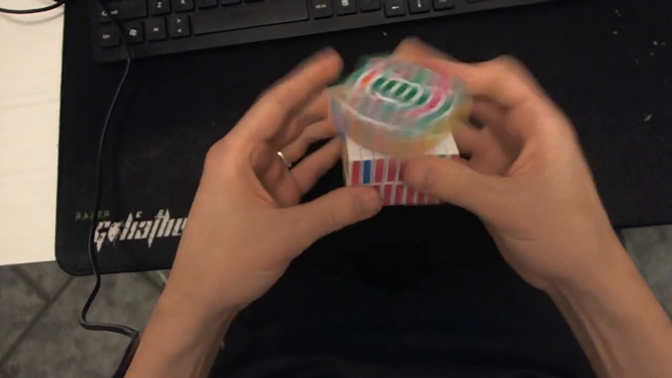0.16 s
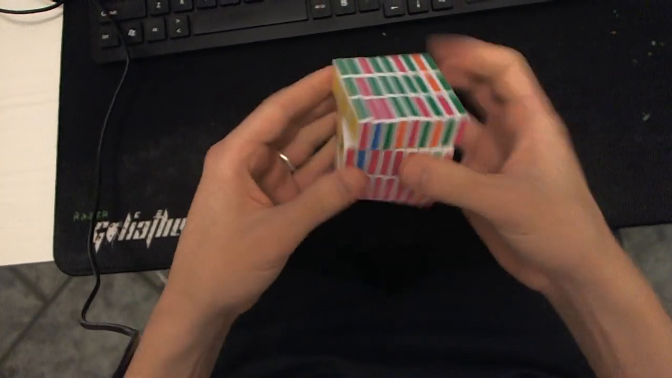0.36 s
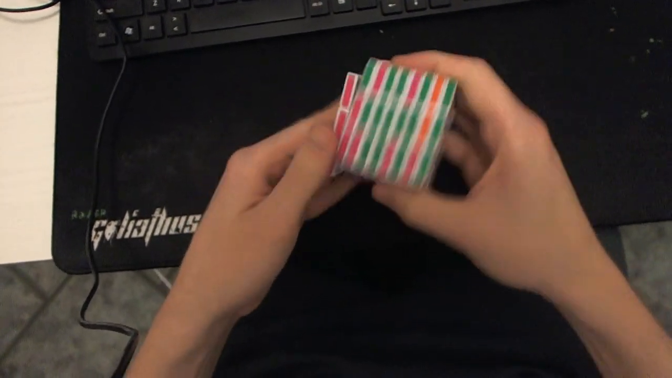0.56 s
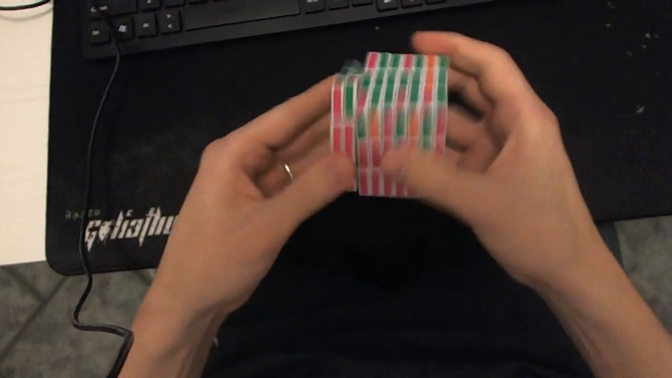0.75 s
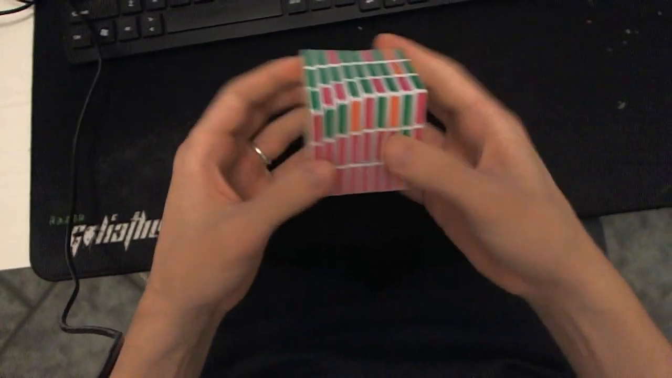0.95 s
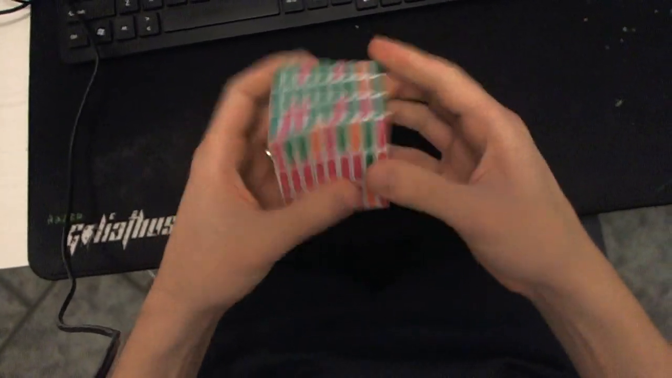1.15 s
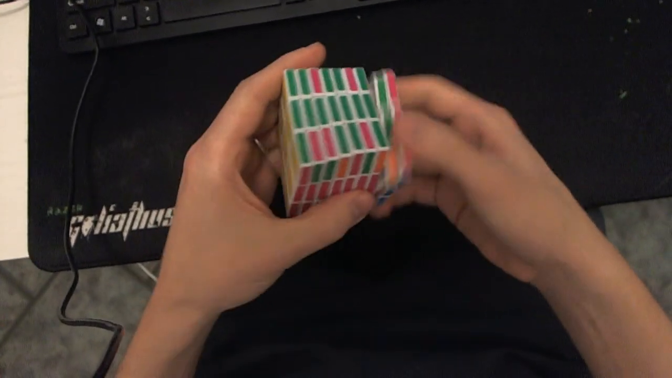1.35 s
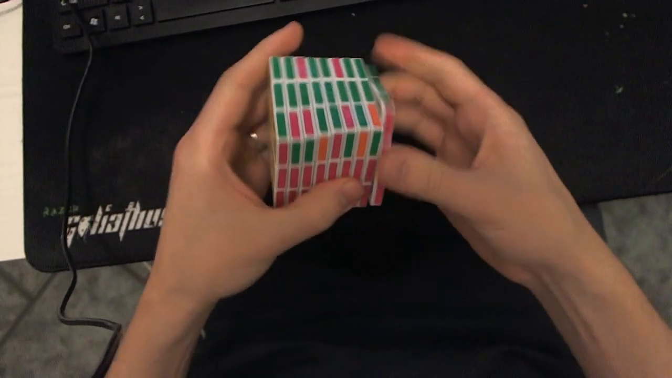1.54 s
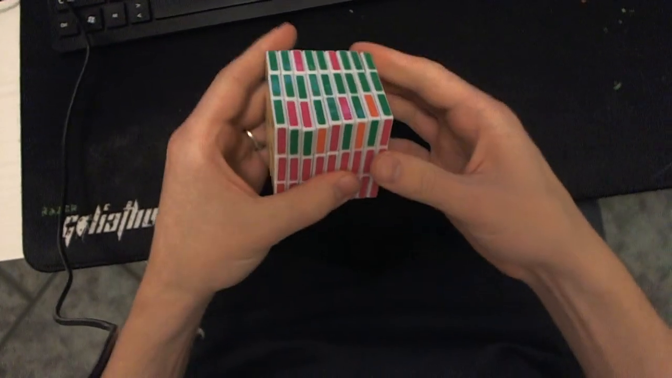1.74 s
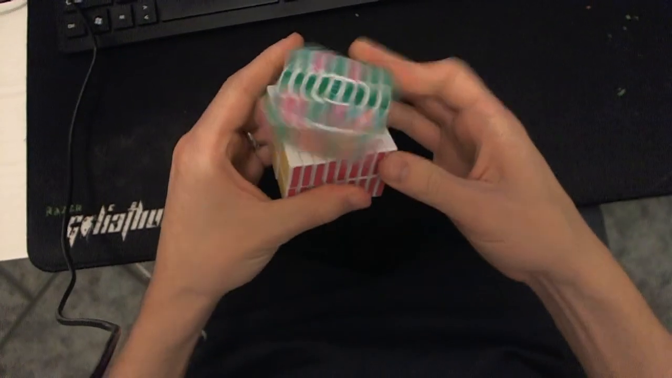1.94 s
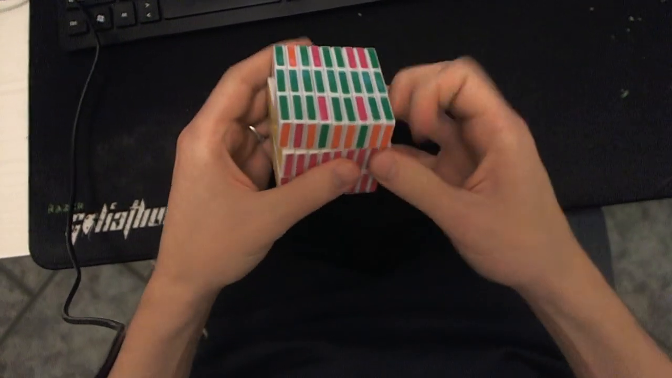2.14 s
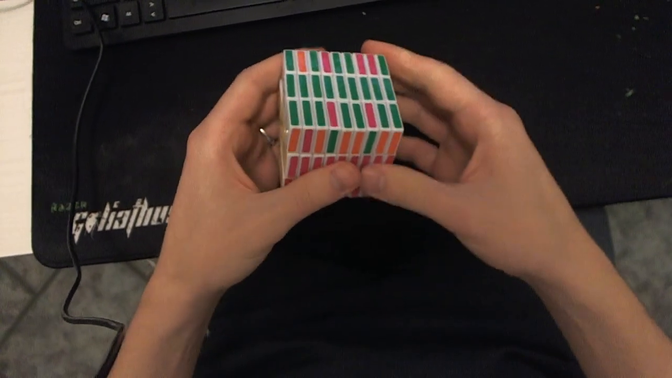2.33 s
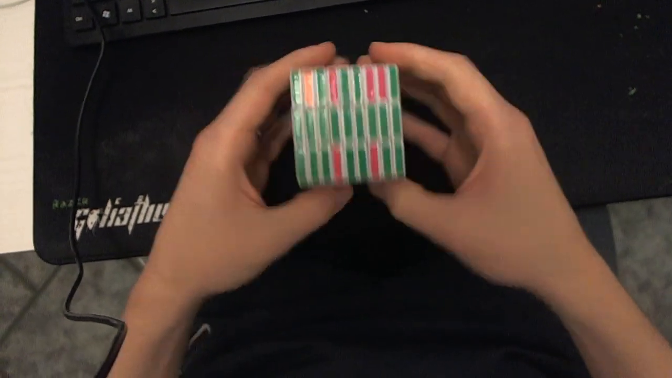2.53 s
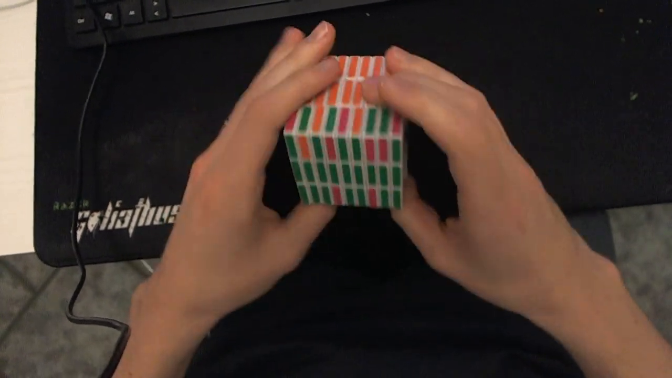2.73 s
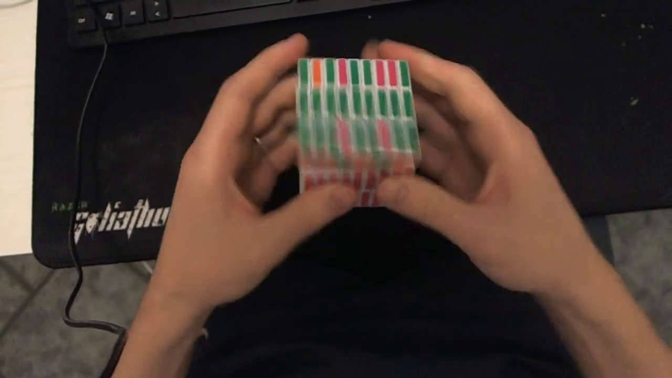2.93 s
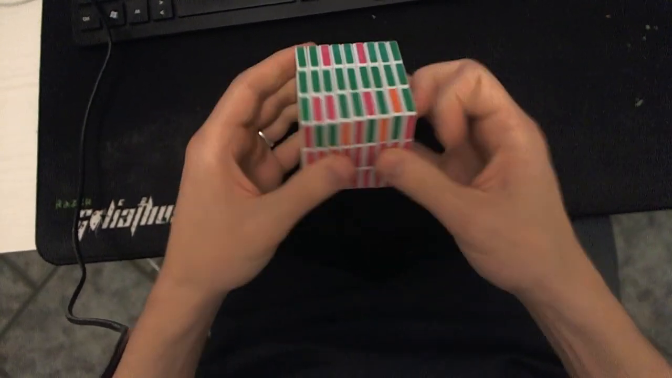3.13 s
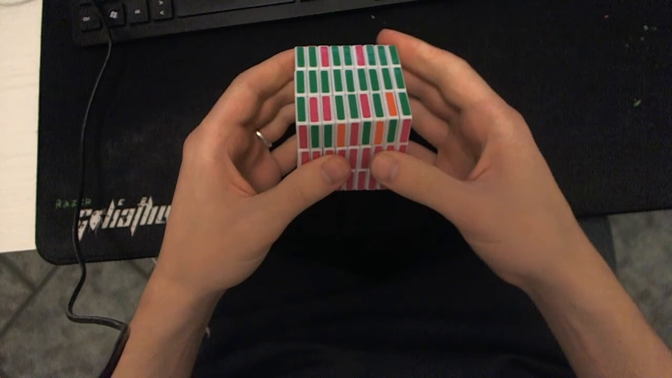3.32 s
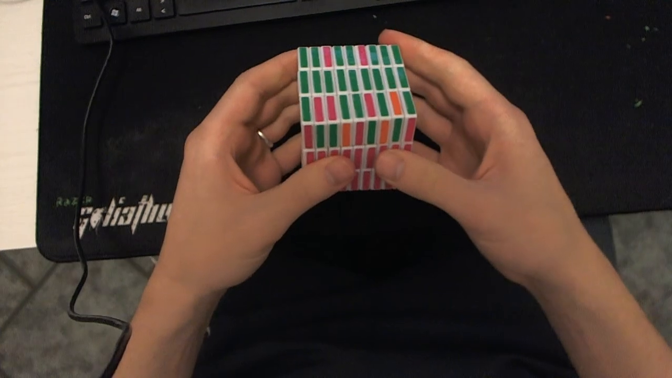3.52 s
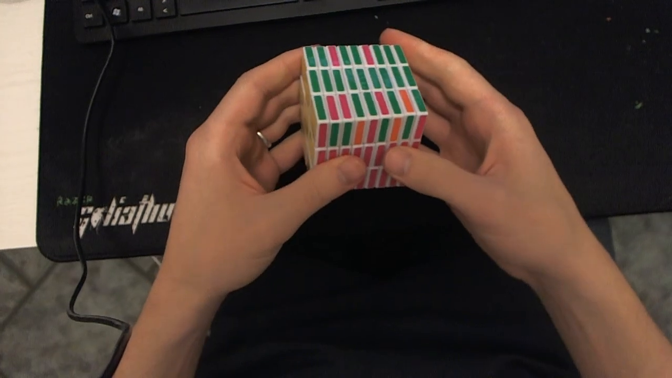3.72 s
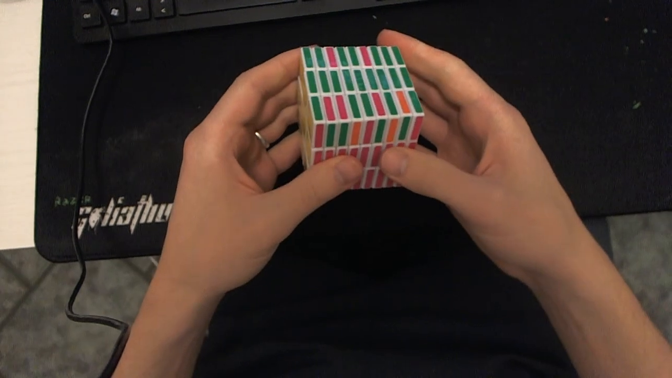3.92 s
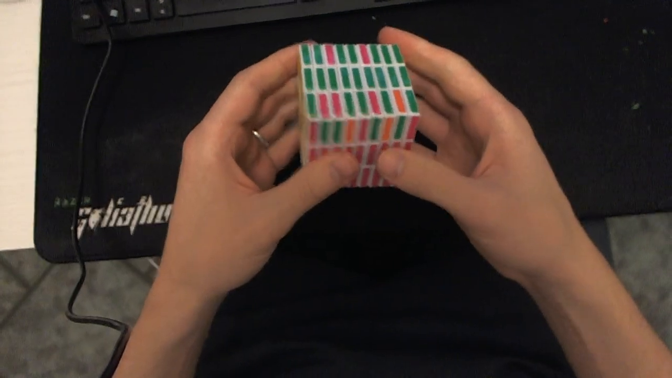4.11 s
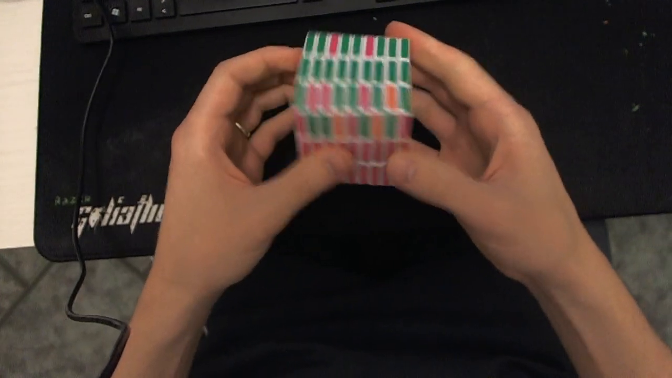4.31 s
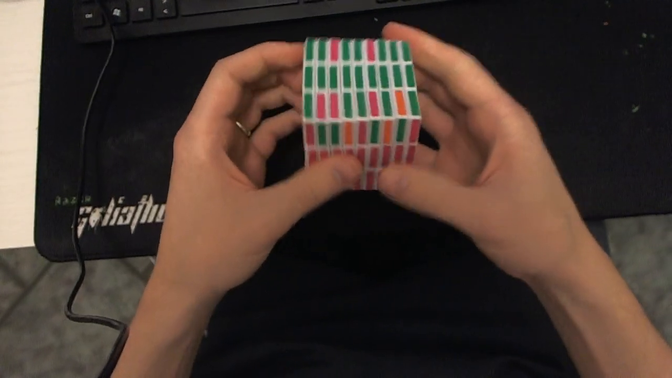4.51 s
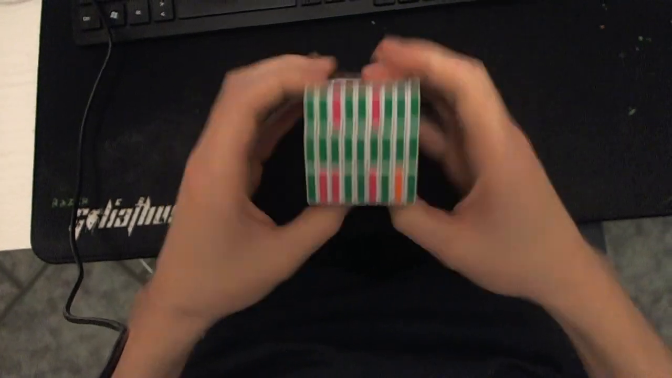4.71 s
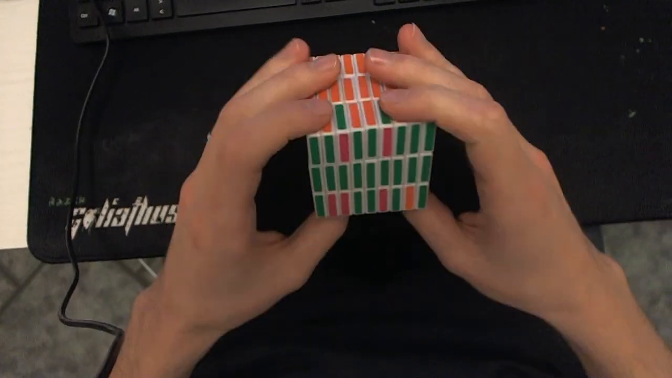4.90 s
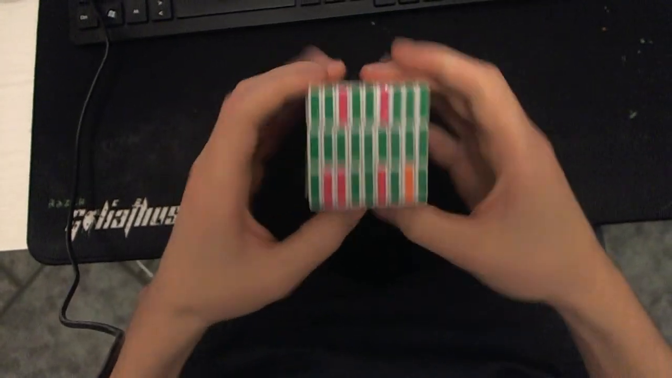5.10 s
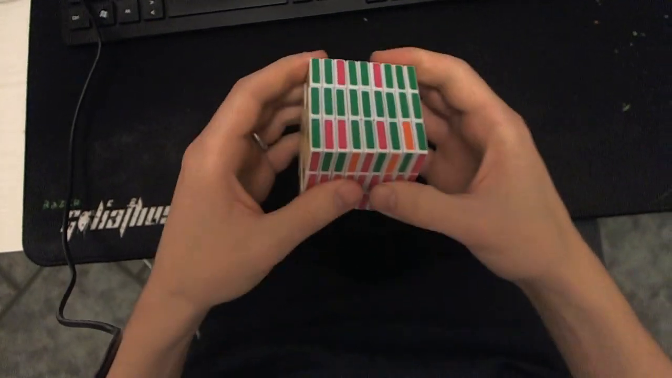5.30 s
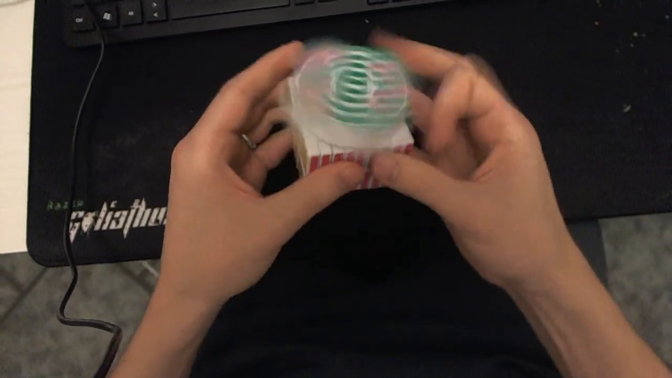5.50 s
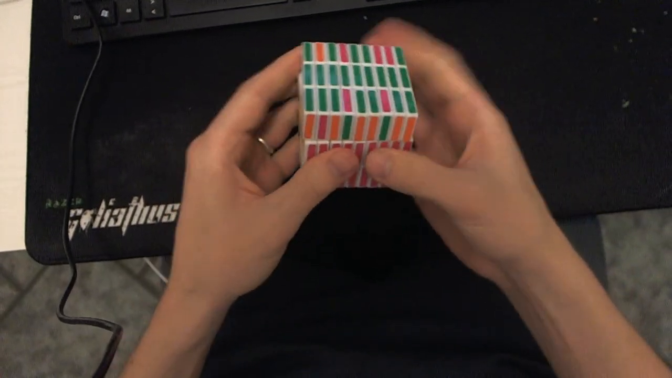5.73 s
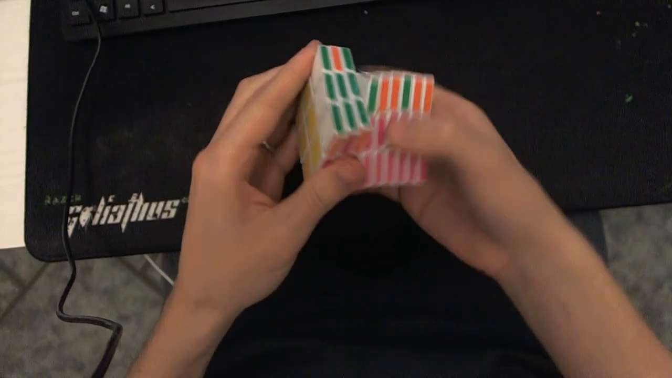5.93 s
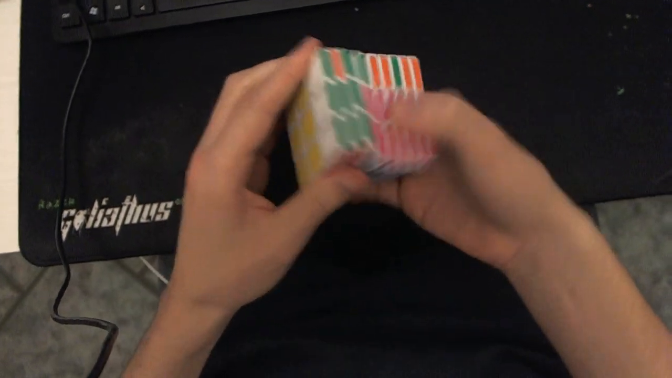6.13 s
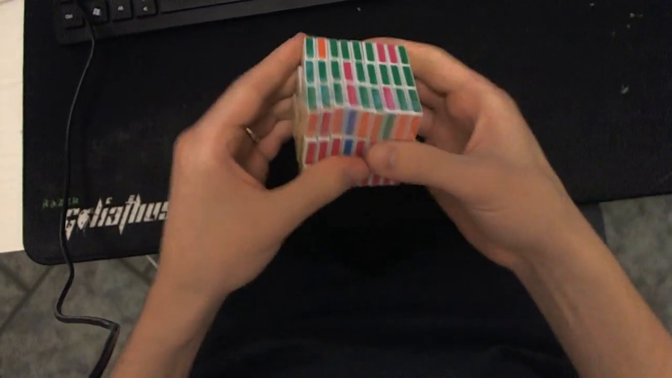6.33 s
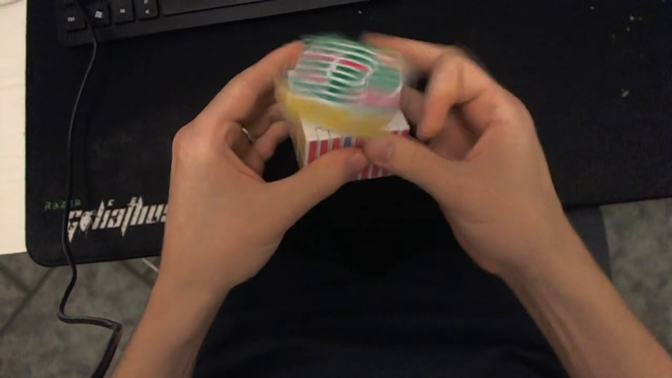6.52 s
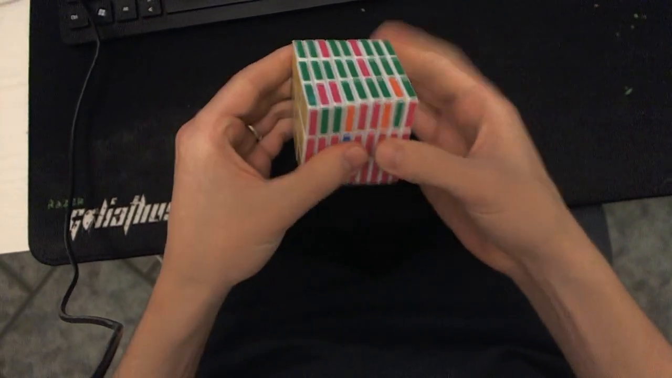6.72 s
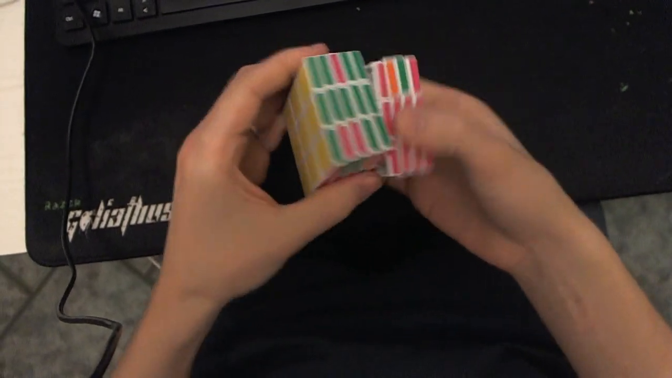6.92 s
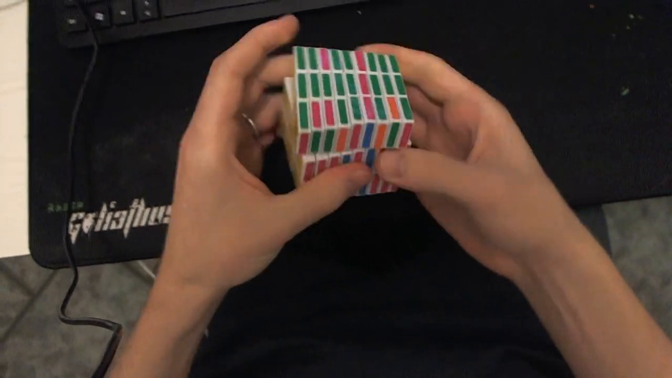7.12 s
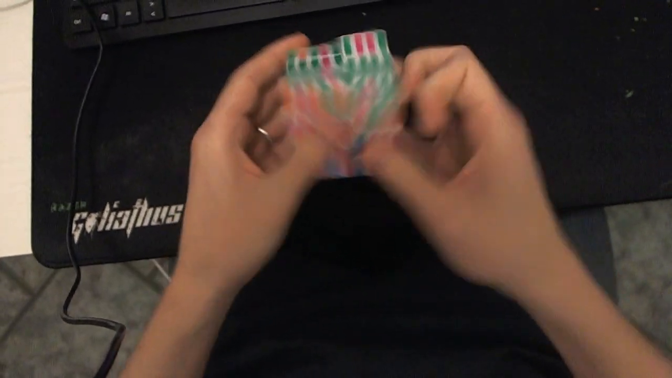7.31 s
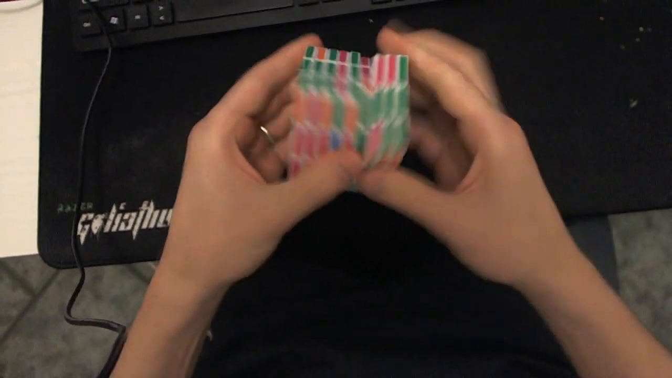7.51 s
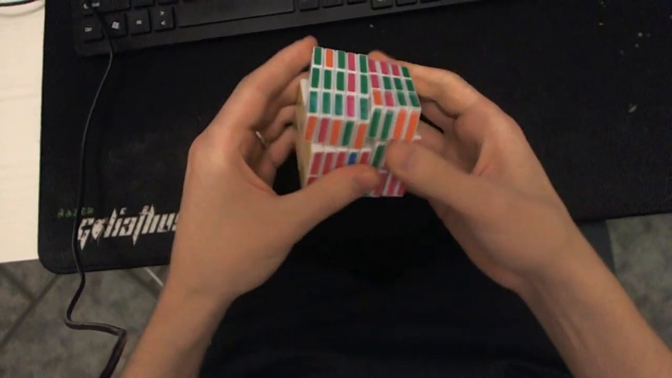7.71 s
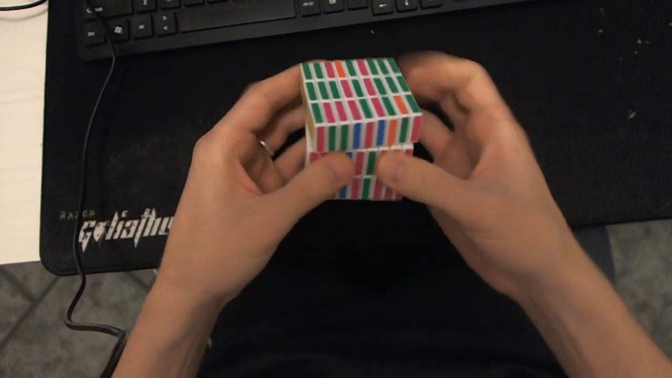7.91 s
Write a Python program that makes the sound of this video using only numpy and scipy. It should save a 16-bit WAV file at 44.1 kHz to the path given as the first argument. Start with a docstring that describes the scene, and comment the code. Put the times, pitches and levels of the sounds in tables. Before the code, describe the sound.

Plastic puzzle layers turned quickly by hand, brisk clacks and rattles with quiet pauses, then a dense fast burst, close up in a small room.

```python
"""A plastic twisty puzzle is turned quickly by hand, close to a stereo microphone in a small quiet room.
Flicked layers swell into a rattle and clack home, among scrapes, short rattles, single knocks and light ticks.
Each contact is a tiny burst of fading noise, coloured like plastic, and it makes the hollow pieces ring.
There is a faint bump and a soft fingertip creak; desk and walls answer with dense echoes,
and a fan hums under a low rush of air."""
import sys
import numpy as np
from scipy import signal
from scipy.fft import rfft, irfft, next_fast_len
from scipy.io import wavfile
from scipy.ndimage import uniform_filter1d

SR = 44100
rng = np.random.default_rng(int(sys.argv[2]) if len(sys.argv) > 2 else 0)


def transcribe(u):
    """Save the signal u as a 16-bit wav file named by the first command-line argument.

    u: samples, shape (n,) or (channels, n), limited to [-1, 1]; the rate is SR.
    q: integer samples, one column per channel.
    """
    v = np.clip(np.atleast_2d(u).T, -1, 1)
    q = np.round(v * 32767).astype(np.int16)
    wavfile.write(sys.argv[1], SR, q)


N = 350595  # length of the scene in samples
GRAIN = 512  # length of one contact in samples
CLICK_S = .003  # a knock's level is its energy spread over this many seconds
KNOCK_DECAY_S = .00075  # time for a contact to fade to 37 %


def amp(db):
    """Turns decibels into gain."""
    return 10 ** (np.asarray(db) / 20)


def evened(x):
    """Scales a signal to an rms level of 1."""
    return x / np.sqrt(np.mean(x ** 2) + 1e-20)


def read(points, hz):
    """Reads a curve of (frequency [Hz], value) points, joined along a log-frequency axis."""
    point_hz, value = np.transpose(points)
    return np.interp(np.log(hz + 1), np.log(point_hz), value)


def add(mix, s, sound):
    """Mixes a sound in at time s in seconds."""
    part = mix[max(round(s * SR), 0):][:len(sound)]
    part += sound[:len(part)]


def colour(x, db_of):
    """Filters with a gain in dB set by frequency; nothing sounds before its cause (minimum phase)."""
    cepstrum = irfft(np.log(amp(db_of(np.fft.rfftfreq(2 * GRAIN, 1 / SR)))))
    # folding the cepstrum onto positive times makes the filter causal
    cepstrum[1:GRAIN] *= 2
    response = irfft(np.exp(rfft(cepstrum[:GRAIN], 2 * GRAIN)))[:GRAIN]
    return signal.fftconvolve(x, response)


def ring(x, modes):
    """Sums resonances (frequency [Hz], width [Hz], level [dB]) that x sets ringing."""
    total = 0
    for hz, width, db in modes:
        b, a = signal.iirpeak(hz, hz / width, SR)
        total = total + amp(db) * signal.lfilter(b, a, x)
    return total


def contact(decay_s):
    """One contact: a crowd of heavily damped modes, different at every spot, of energy 1."""
    burst = rng.standard_normal(GRAIN) * np.exp(-np.arange(GRAIN) / SR / decay_s)
    return burst / np.linalg.norm(burst)


def knock(scuff_db=-17, bounce_db=-5, bounce_s=.0014):
    """Two pieces scuff closer, meet GRAIN samples in, and rebound twice, more weakly each time; energy 1."""
    out = np.zeros(3 * GRAIN)
    # a contact played backwards grows towards the meeting
    add(out, 0, amp(scuff_db) * contact(0.0049)[::-1])
    s = GRAIN / SR
    for bounce in range(3):
        add(out, s, amp(bounce * bounce_db) * contact(KNOCK_DECAY_S))
        s += bounce_s * (.5 + rng.random())
    return out / np.linalg.norm(out)


def plastic(x, body_db, thud_db, treble_db):
    """Gives contacts the colour of the pieces, keeping their energy; each spot favours other modes."""
    # colour of an average knock: (frequency [Hz], gain [dB])
    average_colour = [(40, -46), (200, -33), (370, -20), (780, -14.5), (1000, -7), (1500, -5.5),
                      (2000, -4.5), (2650, 1), (4400, 2), (6300, 0), (8500, -5), (11000, -10),
                      (13500, -25.5), (15800, -51.5)]
    # where each part of the colour acts: (frequency [Hz], share [0-1])
    body_share, thud_share, treble_share = [(1600, 1), (2600, .35), (4000, 0)], [(600, 1), (1000, 0)], [(5500, 0), (8000, 1)]
    spot = np.transpose([np.geomspace(1800, 11000, 14), 2.8 * rng.standard_normal(14)])  # Hz, dB

    def gain_db(hz):
        tilt = body_db * read(body_share, hz) + thud_db * read(thud_share, hz)
        return read(average_colour, hz) + read(spot, hz) + tilt + treble_db * read(treble_share, hz)

    y = colour(x, gain_db)
    return y * np.linalg.norm(x) / np.linalg.norm(y)


def clack(db, body_db, treble_db, centre_hz, emphasis_db=7, sharpness=7, hard_db=-14, thud_slope=1.0):
    """One knock with an emphasis around centre_hz; a harder hit has more low thud, within limits."""
    thud_db = np.clip(thud_slope * (db - hard_db), -7, 2)
    hit = plastic(knock(), body_db, thud_db, treble_db)
    hit = hit + ring(hit, [(centre_hz, centre_hz / sharpness, emphasis_db)])
    return amp(db) * np.sqrt(CLICK_S * SR) * hit / np.linalg.norm(hit)


def any_centre_hz():
    """Centre of a knock's emphasis, picked by chance."""
    return rng.uniform(2500, 6000)


def clicks(level_db=.5, treble_share=.55, treble_db=3.0):
    """Single knocks of layers and light regripping ticks; fuller ones have more body and treble."""
    # single knocks of layers and light ticks of fingers regripping; fullness is low for a thin one:
    # (time [s], level before level_db is added [dB], fullness [dB],
    # centre of an added emphasis in the knock's colour [Hz])
    single_knocks = [(0.0348, -12, -5, 3280), (0.172, -20, -0.5, 3700), (0.2844, -22, 19, 3400),
                     (0.3301, -16.5, 2, 1050), (0.482, -17.5, 3.5, 980), (0.5709, -20, -20, 1650),
                     (0.59, -18, -7, 4616), (0.743, -24, -5, 1850), (0.807, -6.5, -13, 1660),
                     (0.8765, -24.5, -7, 2670), (1.0267, -22, -3.5, 2550), (1.091, -30, -4, 3370),
                     (1.1057, -27.5, 1.5, 1586), (1.2991, -25, -2, 2900), (1.3653, -13, -24, 6100),
                     (1.489, -38, -25, 4600), (1.5278, -23.5, -22, 4550), (1.5405, -18, -15.5, 1500),
                     (1.57, -21, -13.5, 1100), (1.6676, -43, -4, 2350), (1.858, -22, -1.5, 8500),
                     (1.8872, -17.5, -1, 1250), (1.9728, -24, 3, 4640), (2.0866, -17, 15, 1010),
                     (2.2351, -45.5, 12, 6800), (2.345, -43.5, 13, 8050), (2.4937, -30.5, -5, 7600),
                     (2.7826, -45, -8, 3250), (2.863, -36, -4, 4253), (3.235, -42, 8.5, 9100),
                     (3.2784, -49.5, 20, 6400), (3.3329, -51.5, 18.5, 8050), (4.1526, -40, 3, 3500),
                     (4.1748, -35, -6, 7200), (4.197, -35, 0, 5410), (4.217, -36.5, -4, 3940),
                     (4.2565, -40, 2, 8240), (4.272, -37.5, -0.5, 2350), (4.3424, -53.5, 7, 1550),
                     (4.5872, -44.5, 12.5, 5750), (4.659, -29.5, -9, 8500), (4.7668, -34.5, -4, 6830),
                     (4.819, -49.5, 8, 7200), (4.9513, -46.5, -4, 4600), (5.033, -46, -1.5, 6800),
                     (5.2418, -45.5, -2, 8050), (5.2626, -46, -2, 8500), (5.6985, -24, 0.5, 1170),
                     (5.7967, -31, 13.5, 5393), (5.9607, -26.5, -9, 2441), (6.094, -27.5, -11, 3100),
                     (6.1804, -18, -21, 1104), (6.2435, -8.5, -4, 5544), (6.4134, -21, 2, 2960),
                     (6.6709, -16, 1, 6990), (6.8226, -18.5, 6, 4353), (6.8768, -17.5, -3, 1523),
                     (6.9023, -25.5, -5, 5000), (6.965, -23, -19, 4850), (6.9945, -22, 0.5, 1648),
                     (7.0476, -13, -16, 1730), (7.076, -12.5, -7, 5460), (7.0872, -14.5, -8.5, 4700),
                     (7.2653, -9.5, 4, 5550), (7.3095, -5.5, -2, 4344), (7.3895, -13.5, 3, 7610),
                     (7.3992, -19.5, -18, 1102), (7.5281, -21, -23, 2800), (7.5588, -22.5, -22, 3890),
                     (7.589, -15.5, -20, 4600), (7.6871, -15.5, -4, 1261), (7.6972, -8.5, -7.5, 8000)]
    out = np.zeros(N)
    for s, db, full_db, centre_hz in single_knocks:
        hit = clack(db + level_db, full_db, treble_db + treble_share * full_db, centre_hz)
        add(out, s - GRAIN / SR, hit)
    return out


def rattle(span, shape_db, per_s, spread_db):
    """A swarm of small contacts whose level follows shape_db(seconds)."""
    hits = int(span * per_s) + 1
    times = (np.arange(hits) + rng.random(hits)) * span / hits
    swarm = np.zeros(int(span * SR) + GRAIN)
    for s in times:
        chance_db = spread_db * np.clip(rng.standard_normal(), -2, 2)
        add(swarm, s, amp(shape_db(s) + chance_db) * contact(KNOCK_DECAY_S))
    wanted_energy = np.mean(amp(shape_db(times)) ** 2) * span * SR
    return swarm * np.sqrt(wanted_energy) / np.linalg.norm(swarm)


def edges(start, span, shape_db, per_s, body_db, treble_db, spread_db=2, glance_db=3):
    """Edge after edge catches as pieces move, some squarely and some glancing: (time [s], sound) pairs."""
    passes = int(span * per_s)
    for k in range(passes):
        t = span * (k + rng.random()) / passes
        force, square = np.clip(rng.standard_normal(2), -2, 2)
        square_db = glance_db * square
        tick_db = shape_db(t) + spread_db * force
        tick = clack(tick_db, body_db + square_db, treble_db + square_db, any_centre_hz())
        yield start + t - GRAIN / SR, tick


def flicks(level_db=-2.0, body_db=2.5, thud_db=1.0, treble_db=2, spread_db=3.0):
    """A flicked layer rattles ever louder over its neighbours, clacks home and shivers to rest."""
    # quarter turns flicked by a finger, in pairs that make a half turn; level_db trims the rattle only:
    # (landing time [s], run-up [s], settling [s], level before trims [dB])
    flicked_turns = [(0.2399, .062, 0.016, -18), (0.3192, .04, .022, -21), (2.041, .06, 0.011, -21.5),
                     (2.097, .035, .022, -18), (3.0676, .046, 0.015, -15), (3.114, .04, .022, -19),
                     (5.5488, .044, 0.018, -14), (5.601, .04, .04, -22.5), (6.5465, .056, .008, -13.5),
                     (6.6056, .035, .018, -14), (7.2802, .06, .012, -21), (7.3146, .02, .035, -14.5),
                     (7.836, .047, .008, -13.5), (7.8838, .035, .035, -17)]
    # air inside the whole puzzle, stirred by a flick: (frequency [Hz], width [Hz], level against the flick [dB])
    cavity_modes = [(378, 120, -2.5), (900, 420, -8)]
    swell_db, settle_db = 13, 9  # rise over the run-up, fall while settling
    clack_db, clack_body_db, clack_treble_db = 6, 1, 6  # landing knock: level above the listed one, colour
    tick_body_db, tick_treble_db = 4, 5
    per_s, edges_per_s = 580, 110  # contacts and passing edges per second
    out = np.zeros(N)
    for s, run_s, settle_s, db in flicked_turns:
        def shape_db(t):
            before = swell_db * (1 - t / run_s) ** 2
            after = settle_db * (t - run_s) / settle_s
            return db - np.where(t < run_s, before, after)

        start, span = s - run_s, run_s + settle_s
        swarm = rattle(span, shape_db, per_s, spread_db)
        add(out, start, amp(level_db) * plastic(swarm, body_db, thud_db, treble_db))
        for at, tick in edges(start, span, shape_db, edges_per_s, tick_body_db, tick_treble_db):
            add(out, at, tick)
        landing = clack(db + clack_db, clack_body_db, clack_treble_db, any_centre_hz())
        add(out, s - GRAIN / SR, landing)
    return out + ring(out, cavity_modes)


def scrapes(level_db=-3.0, tick_db=5, hard_db=-22, thud_slope=.7, treble_slope=0.78, spread_db=7.0):
    """Moving pieces scrape or rattle evenly, fuller and brighter with force, and tick as edges pass."""
    # scrapes and short rattles of moving pieces, long or very brief;
    # level_db trims the scrape and tick_db lifts the ticks:
    # (start [s], end [s], level before these [dB], hollow body [dB])
    moving_pieces = [(0.002, 0.099, -35.5, 0.5), (0.361, 0.41, -40, 7), (0.519, 0.606, -35, -1.5),
                     (0.697, 0.77, -37.5, -9), (0.805, 0.819, -18, -2), (0.857, 0.909, -47, -3),
                     (0.979, 0.995, -49, 1), (1.056, 1.121, -41, -5), (1.283, 1.316, -34.5, -3),
                     (1.354, 1.406, -44.5, 12.5), (1.535, 1.6, -33.5, -1), (1.89, 1.902, -27, 2),
                     (2.962, 3.02, -38.5, 5.5), (4.135, 4.156, -43.5, -2), (4.686, 4.716, -44, 0),
                     (5.017, 5.043, -52, -7), (5.456, 5.475, -31.5, -1), (5.867, 5.903, -33.5, 3),
                     (5.912, 6.023, -44.5, -13), (6.173, 6.312, -29.5, -0.5), (6.419, 6.432, -21.5, 2.5),
                     (6.63, 6.714, -34, 1.5), (6.796, 6.894, -30, -1), (6.98, 7.023, -33.5, -4),
                     (7.042, 7.101, -28.5, 1.5), (7.201, 7.219, -35.5, -7), (7.351, 7.439, -27.5, -2),
                     (7.461, 7.602, -36, -12), (7.684, 7.704, -15, -12)]
    margin_s, ease_db_per_s = .01, 1800  # the scrape fades in and out just outside its span
    per_s, edges_per_s = 450, 65  # contacts and passing edges per second
    out = np.zeros(N)
    for start, end, db, body_db in moving_pieces:
        force_db, span = db - hard_db, end - start

        def shape_db(t):
            outside_s = np.maximum(abs(t - margin_s - span / 2) - span / 2, 0)
            return db - ease_db_per_s * outside_s

        swarm = rattle(span + 2 * margin_s, shape_db, per_s, spread_db)
        thud_db = np.clip(thud_slope * force_db, -8, 2)
        scrape = plastic(swarm, body_db, thud_db, treble_slope * min(force_db, 0))
        add(out, start - margin_s, amp(level_db) * scrape)
        for at, tick in edges(start, span, lambda t: db, edges_per_s, body_db, 0):
            add(out, at, amp(tick_db) * tick)
    return out


def handling(body_db=-5, thud_db=-3, treble_db=-5):
    """Fingers regrip and loose pieces tick faintly: small knocks at chance times and levels."""
    # stretches of ticking: (start [s], end [s], level before a chance change of -12 to +4 dB [dB])
    ticking_spans = [(0, 1.72, -49), (2.15, 3.4, -64), (5.45, 7.95, -48)]
    per_s, spread_db = 28, 4
    out = np.zeros(N)
    for start, end, db in ticking_spans:
        for s in np.arange(start, end, 1 / per_s):
            size = amp(db + spread_db * rng.uniform(-3, 1)) * np.sqrt(CLICK_S * SR)
            tick = plastic(knock(), body_db, thud_db, treble_db)
            add(out, s + rng.uniform(-1.1, 1) / per_s, size * tick)
    return out


def soft_handling(pulse_hz=340, jitter=0.88):
    """A faint bump, then a fingertip creak: unsteady rapid pulses set low modes ringing briefly."""
    # soft low handling sounds, a faint bump, then a fingertip creak:
    # (time [s], level before the rise and fade [dB])
    soft_sounds = [(0.052, -53), (1.721, -43.5)]
    # low resonances, passed through twice: (frequency [Hz], width [Hz], level at each pass [dB])
    low_modes = [(380, 160, 10), (680, 450, 5.5)]
    length_s, rise_s, fade_db_per_s = .042, 0.017, 325
    t = np.arange(0, length_s, 1 / SR)
    ramps = np.minimum(np.minimum(t, length_s - t) / rise_s, 1)
    shape = ramps * amp(-fade_db_per_s * (t - rise_s))
    out = np.zeros(N)
    for s, db in soft_sounds:
        unsteady = 1 + jitter * evened(uniform_filter1d(rng.standard_normal(len(t)), 150))
        # one pulse each time the running count passes a whole number
        pulses = np.diff(np.floor(np.cumsum(pulse_hz * unsteady) / SR), prepend=0)
        add(out, s, amp(db) * shape * evened(ring(ring(pulses, low_modes), low_modes)))
    return out


def reflections(t60_of, first_s):
    """Dense echoes of energy 1 that begin after first_s and die at a rate set by frequency."""
    taps = rng.standard_normal(SR // 2) * (rng.random(SR // 2) < .2)
    hz, t, z = signal.stft(taps, SR, nperseg=256)
    decay = np.exp(-np.log(1000) * t / t60_of(hz)[:, None])  # 60 dB down after t60
    tail = signal.istft(z * decay, SR, nperseg=256)[1]
    return np.pad(tail / np.linalg.norm(tail), (int(first_s * SR), 0))


def room(x, desk_db=-13, desk_t60=0.045, walls_db=-14):
    """Desk and hands answer at once, the walls later; the paths shift as the puzzle moves."""
    # how long the walls echo: (frequency [Hz], time to fall by 60 dB [s])
    walls_t60 = [(1000, .23), (2500, .16), (5000, .19), (8000, .165), (14000, .14)]
    out = np.zeros(N)
    for k in range(3):
        # three sets of paths take turns once a second; their squared shares add up to 1
        share = np.sqrt(2 / 3) * np.cos(2 * np.pi * (np.arange(N) / SR + k / 3))
        desk = reflections(lambda hz: desk_t60 + 0 * hz, first_s=0.0014)
        walls = reflections(lambda hz: read(walls_t60, hz), first_s=.007)
        out += amp(desk_db) * signal.oaconvolve(x * share, desk)[:N]
        out += amp(walls_db) * signal.oaconvolve(x * share, walls)[:N]
    return out


def microphones(x):
    """Two close capsules hear everything at the same time, but each with its own colour."""
    # how the two hear the puzzle: (frequency [Hz], left minus right [dB])
    balance = [(200, 0), (700, 3), (1000, 3), (1500, 0), (2600, 0), (3300, -4.5), (3900, -10), (4500, -1),
               (5200, 3.5), (6300, 3), (7400, 0)]
    size = next_fast_len(N + GRAIN)
    ratio = amp(read(balance, np.fft.rfftfreq(size, 1 / SR)))  # left over right
    right = np.sqrt(2 / (1 + ratio ** 2))  # keeps the summed power of both sides
    return irfft(rfft(x, size) * np.array([ratio * right, right]), size)[:, :N]


def background(air_db=-69, side_db=-9, waver=.007):
    """A fan hums with a slightly unsteady pitch over a low rush of air, made of filtered noise."""
    # tones of the fan, before the right side is favoured: (frequency before the waver [Hz], level [dB])
    hum_tones = [(127, -69), (255, -79.5), (511, -77), (1022, -79.5)]
    # colour of the air, of which only the shape counts: (frequency [Hz], level per Hz [dB])
    air_colour = [(25, -25.5), (55, -32.5), (110, -3.5), (250, -2), (1000, -4.5), (1400, -8), (2400, -13),
                  (5500, -20.5), (15000, -44)]
    shape = amp(read(air_colour, np.fft.rfftfreq(N, 1 / SR)))
    mid, side = (evened(irfft(rfft(rng.standard_normal(N)) * shape, N)) for _ in range(2))
    air = amp(air_db) * (mid + amp(side_db) * np.array([side, -side]))
    speed = 1 + waver * evened(uniform_filter1d(rng.standard_normal(N), 2500))
    turns = np.cumsum(speed) / SR
    hum = sum(amp(db) * np.sin(2 * np.pi * (hz * turns + rng.random())) for hz, db in hum_tones)
    return air + hum * amp([[-1], [1]])  # left, right dB


def scene(wide_db=-17):
    """Contacts ring the hollow pieces; the room answers, a little differently on each side."""
    # lasting rings of the hollow pieces: (frequency [Hz], width [Hz], level against the knock [dB])
    shell_modes = [(1026, 15, 0.5), (1133, 25, -2), (1358, 66, -4), (1587, 85, -3), (2510, 200, -13),
                   (4410, 65, -3.5), (8380, 17, -2.5), (9400, 17, -3.5)]
    contacts = clicks() + flicks() + scrapes() + handling()
    puzzle = contacts + ring(contacts, shell_modes) + soft_handling()
    # the moving fingers shade now one side, now the other
    drift = signal.oaconvolve(rng.standard_normal(N), np.hanning(2000), "same")
    shade = .07 * evened(drift)
    centre = puzzle + room(puzzle)
    wide = shade * puzzle + amp(wide_db) * room(puzzle)
    return microphones(np.array([centre + wide, centre - wide])) + background()


def record(dry, ceiling=.9, low_cut_hz=250, edge_hz=16000):
    """Peaks overload the input, which passes little bass of its own distortion; then the top is cut off."""
    excess = dry - np.clip(dry, -ceiling, ceiling)
    high_pass = signal.butter(2, low_cut_hz, "high", fs=SR, output="sos")
    clipped = dry - signal.sosfilt(high_pass, excess)
    low_pass = signal.firwin(255, edge_hz, window=("kaiser", 8), fs=SR)
    return signal.oaconvolve(clipped, low_pass[None], "same")


dry = scene()
out = record(dry)
transcribe(out)
```